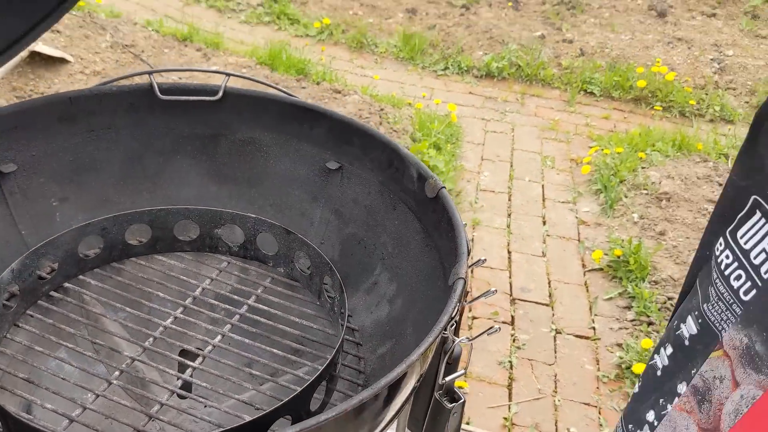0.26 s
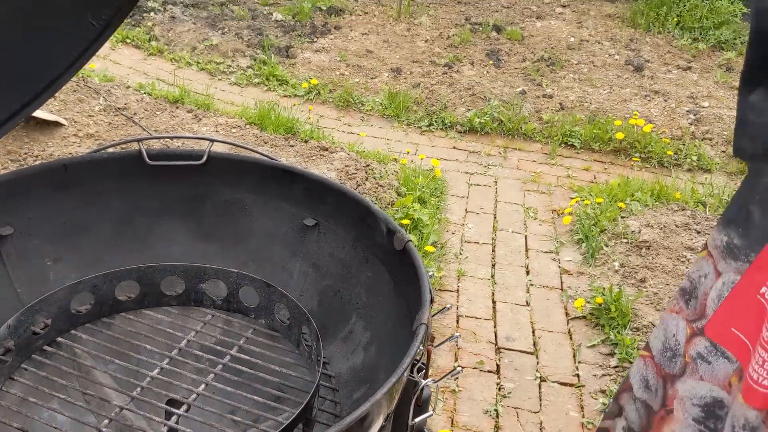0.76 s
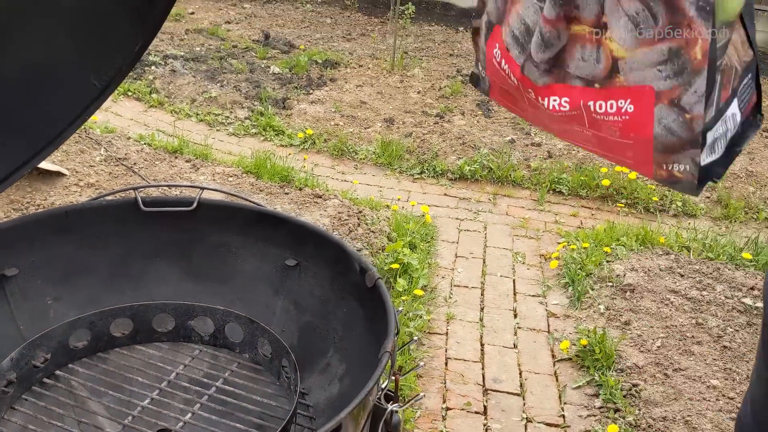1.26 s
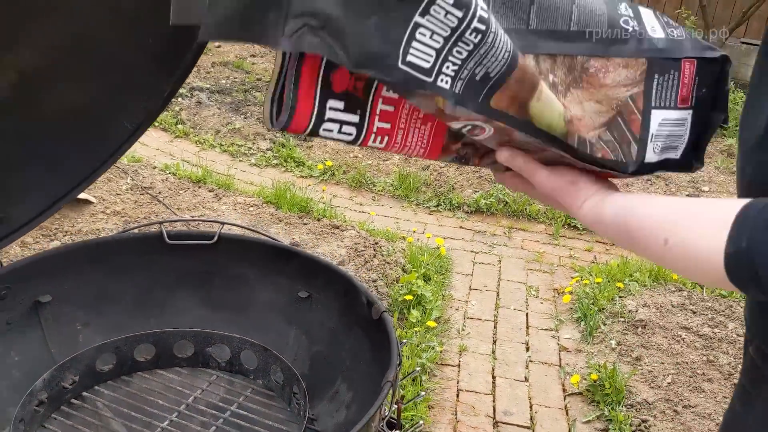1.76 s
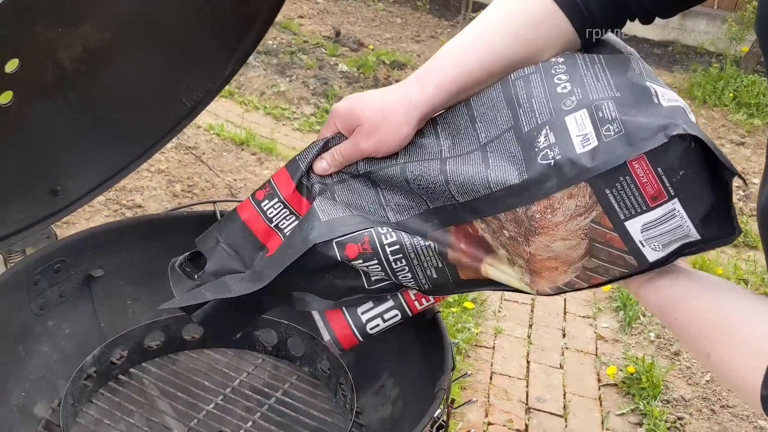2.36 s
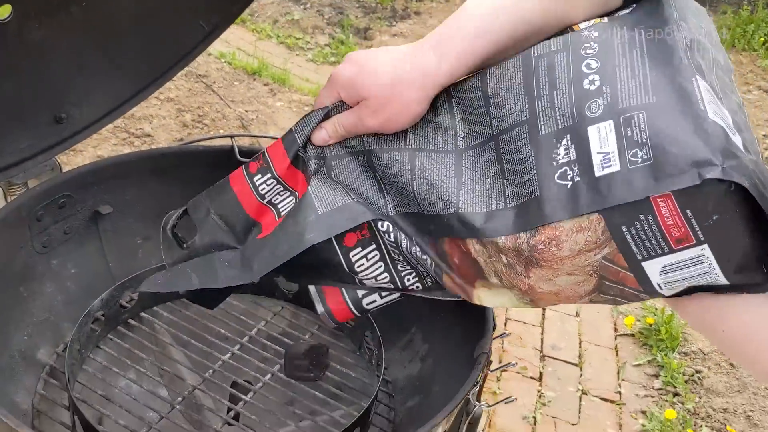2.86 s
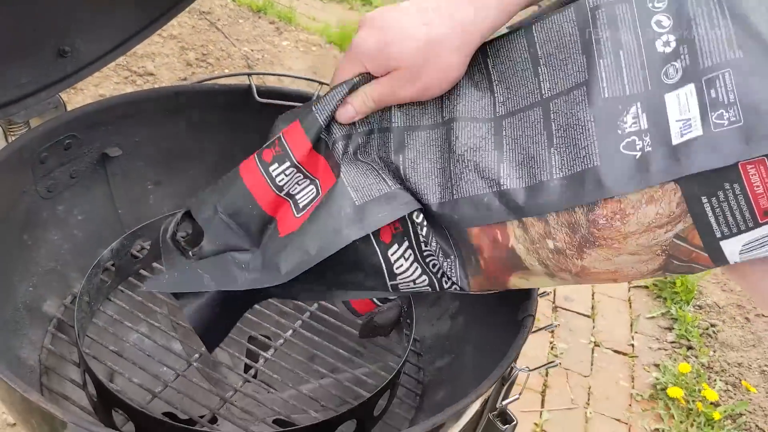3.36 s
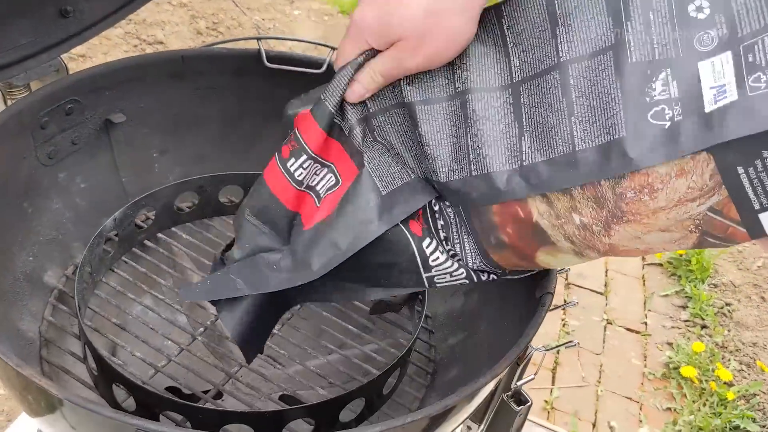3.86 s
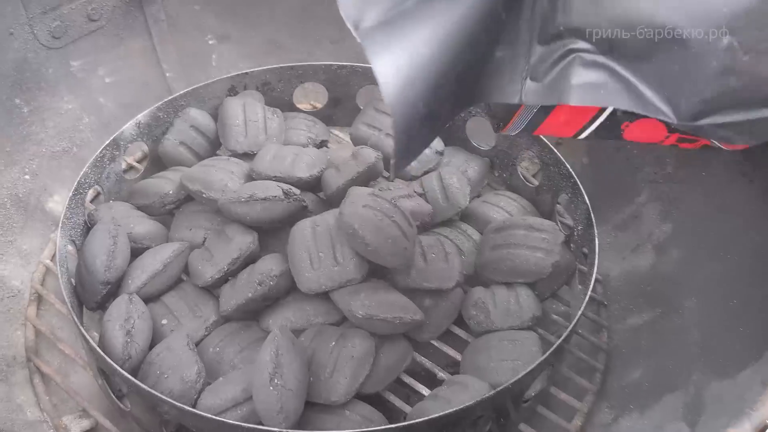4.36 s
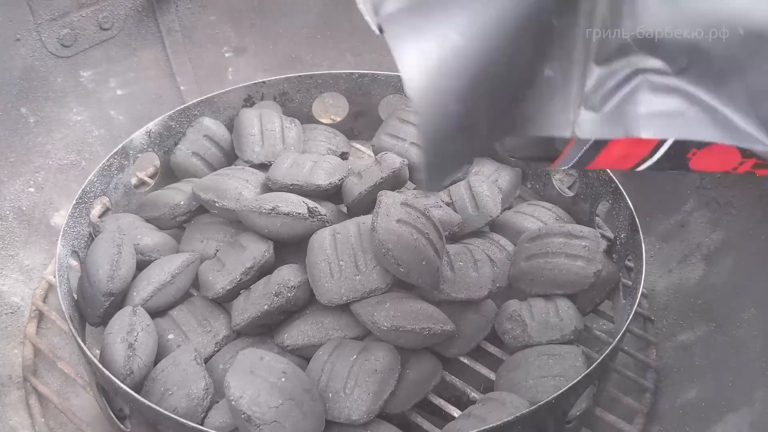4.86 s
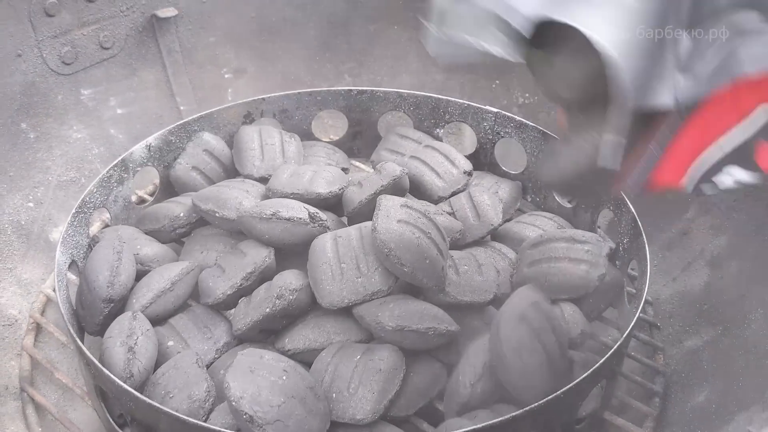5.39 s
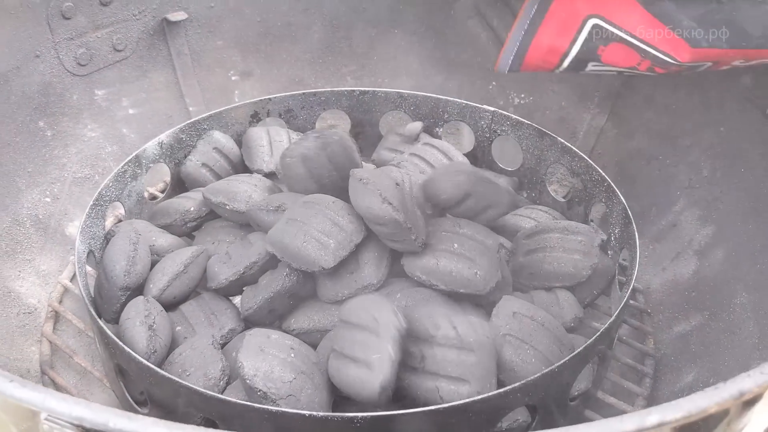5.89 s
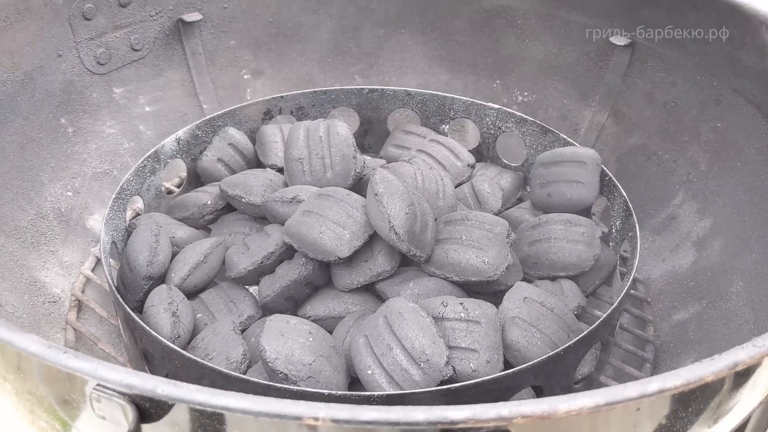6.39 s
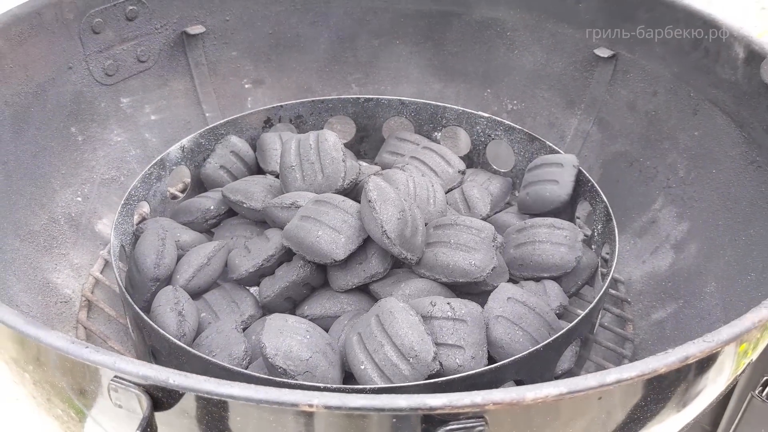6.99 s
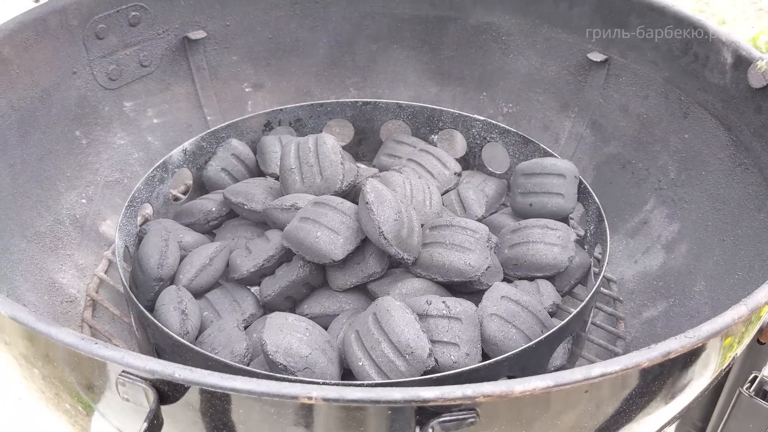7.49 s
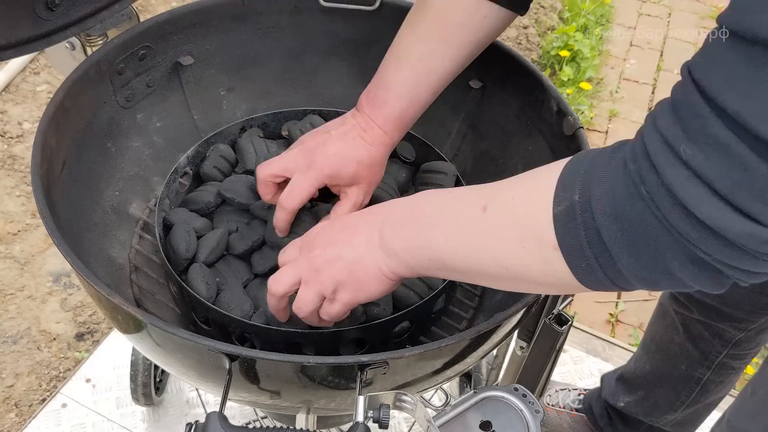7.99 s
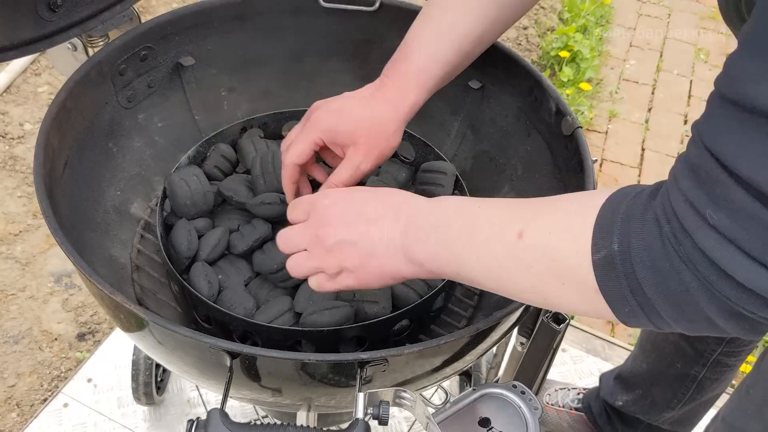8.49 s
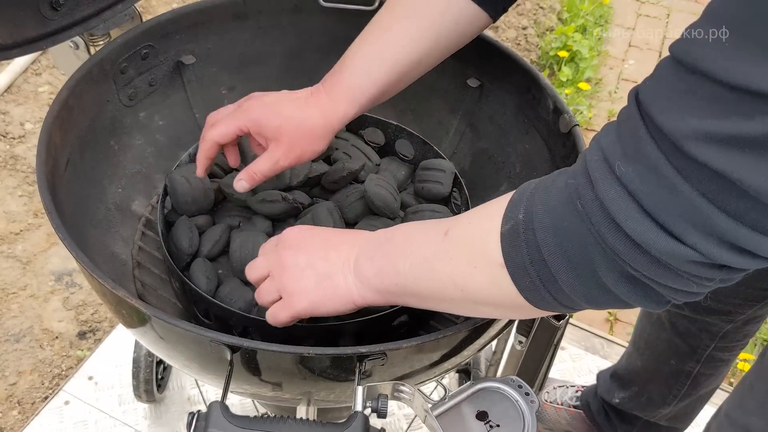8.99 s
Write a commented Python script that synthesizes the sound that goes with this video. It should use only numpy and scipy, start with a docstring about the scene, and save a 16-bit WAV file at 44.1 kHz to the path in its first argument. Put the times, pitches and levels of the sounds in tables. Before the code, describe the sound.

A stiff bag of charcoal briquettes is lifted with a scuff and scattered dull knocks, then shaken and poured into a steel kettle grill. Dense dry clatter, low bag thuds and clinks from the grate continue, thinning to single knocks. The sound cuts out briefly, returns with two tiny pops, then sparse quiet clinks as hands arrange the coals. Close microphone, outdoors, little background.

```python
"""First a brief dull scuff and near quiet, then lumps begin to knock: a stiff bag of charcoal briquettes is
lifted, shaken and poured into a steel kettle grill outdoors. Short crowded modes make the knocks, a hail of
tiny ones over noise the rattle, shaped noise the bag's thuds and the bowl's hum, ringing modes the clinking
grate. The sound drops out for a moment and returns with two pops, falling tones with ticks, treble left and
bass right."""
import sys
import numpy as np
from scipy import signal
from scipy.fft import rfft, irfft
from scipy.io import wavfile
from scipy.ndimage import uniform_filter1d

SR = 44100
rng = np.random.default_rng(int(sys.argv[2]) if len(sys.argv) > 2 else 0)


def write(x):
    x = np.atleast_2d(x).T
    wavfile.write(sys.argv[1], SR, np.round(np.clip(x, -1, 1) * 32767).astype(np.int16))


N = 407880  # length in samples

# How hard the coals tumble, one curve before the drop-out and one after:
# start_s, level_db (of the rattle's body), treble_db (against the body)
TUMBLE = [
    [(0.0, -45.5, -30), (0.04, -85, 9), (0.16, -72.5, -8), (0.24, -60, -2.5), (0.43, -52, -15),
     (0.7, -72.5, -8.5), (0.77, -41, -20), (0.96, -63.5, 2), (1.23, -49.5, -10.5), (1.33, -61.5, -17),
     (1.58, -74, -14), (1.62, -57.5, -1), (1.85, -52.5, -22), (2.05, -53, -16.5), (2.28, -39.5, -10.5),
     (2.6, -40.5, -12), (2.71, -46.5, -15), (2.85, -42, -5), (2.93, -46, -15), (2.96, -40, -3),
     (3.48, -41, -13.5), (3.86, -38.5, -11.5), (3.9, -41.5, 0.5), (4.24, -38.5, -6), (4.255, -47, -22.5),
     (4.42, -39.5, -11), (4.71, -48, -14), (5.08, -37.5, -16.5), (5.27, -47.5, -8), (5.65, -34, -14.5),
     (6.02, -55, -0.5), (6.12, -57, 1.5), (6.21, -64, -2.5), (6.5, -52.5, -3), (6.72, -47, -4),
     (7.15, -40, -9), (7.66, -60, -5)],
    [(7.98, -108, 11), (8.07, -102, 10), (8.13, -88.5, 16), (8.33, -71.5, 4), (8.46, -76, 2),
     (8.7, -102, 0), (8.84, -68, -3), (8.968, -76.5, -2.5), (9.249, -80.5, 1)],
]
# Clear single knocks: start_s, level_db, body_db, grit_db, t60_s (of the tail's fade)
KNOCKS = [(0.185, -48.5, 1.5, -6, 0.23), (0.2807, -52, -2, 3, 0.064), (0.299, -43, 6, -29, 0.17),
          (0.317, -37.5, 6.5, -27, 0.14), (0.342, -53, 20, 2, 0.047), (0.3834, -42.5, -1, 2.5, 0.47),
          (0.407, -41.5, 8, 0, 0.11), (0.4286, -46, 5, -6, 0.15), (0.448, -30.5, -2, -26, 0.13),
          (0.5621, -56, 10, 1, 0.59), (0.6271, -52, 6.5, -19, 0.082), (0.74, -43.5, 10.5, -6, 0.14),
          (0.7485, -34, -0.5, -9, 0.59), (0.7717, -29, -11, -5, 0.26), (0.797, -29, -0.5, -9, 0.22),
          (0.813, -36, 1, -1, 0.052), (0.8657, -33.5, 2.5, -5, 0.14), (0.875, -44, -10, -10, 0.073),
          (0.91, -36.5, 0.5, -23, 0.054), (0.973, -43, -5, -9, 0.062), (1.0355, -39, 5.5, 1, 0.03),
          (1.045, -25, -17, -10, 0.056), (1.0943, -29, 0.5, -0.5, 0.024), (1.1177, -35, 2, -14, 0.076),
          (1.137, -35, -5, -12, .06), (1.151, -34, -1, -22, 0.21), (1.178, -32, 1.5, -6, 0.25),
          (1.207, -31.5, 4.5, -10, 0.082), (1.2209, -25.5, -2.5, -16, 0.2), (1.2343, -31, -1, -2.5, 0.15),
          (1.2572, -37, 3, -21, 0.16), (1.3544, -34, 1.5, -46, 0.026), (1.372, -56, 17, -36, 0.042),
          (1.4377, -26, -4, -17, 0.08), (1.601, -62, -14, 11, 0.075), (1.625, -49.5, 11, -21, 0.042),
          (1.738, -55.5, 15.5, -24, 0.21), (1.8179, -43, 7.5, -19, 0.2), (1.8332, -38.5, 4, -21, 0.084),
          (1.87, -30, -12, -19, 0.042), (1.8932, -37.5, 6, -20, 0.044), (2.0311, -27.5, 1, -11.5, 0.057),
          (2.0779, -32.5, 2.5, -13, 0.082), (2.104, -44, 11, -11, 0.082), (2.124, -31, 3.5, -1.5, 0.089),
          (2.1494, -28.5, -3, -5, 0.13), (2.2078, -30.5, 1.5, -21, 0.8), (2.232, -34, 4, -19, 0.052),
          (2.26, -32.5, -1, 1, 0.029), (2.288, -28, -6, -36, 0.084), (2.2997, -19.5, -6, -15.5, 0.06),
          (2.3525, -29, 1, -3, 0.78), (2.4112, -29, 3.5, -42, 0.15), (2.4425, -25.5, -3, -34, 0.15),
          (2.4976, -37, 10, -25, 0.061), (2.5475, -33.5, 13.5, -7, 0.037), (2.58, -30, -11, -3, 0.17),
          (2.6048, -30, 0, -3.5, 0.45), (2.7668, -31, -4, -11, 0.11), (2.7983, -41.5, 13, -4, 0.21),
          (2.806, -42, -1, -13.5, 0.059), (2.828, -25, -3, -29.5, 0.3), (2.8557, -26.5, -1, -0.5, 0.16),
          (2.866, -36, 3, 10, 0.081), (2.877, -37, 7, -3.5, 0.046), (2.8847, -28.5, 3.5, -27.5, 0.098),
          (2.9253, -34, 2, -9, .06), (3.01, -27, -24, -8, 0.082), (3.054, -34, -6, -6, .06),
          (3.09, -33, -8, -7, 0.083), (3.1225, -35, 11, -23, 0.17), (3.147, -31, -10, -26, 0.081),
          (3.25, -39, 14, -23.5, 0.068), (3.276, -45, 6, -12.5, 0.056), (3.298, -28, -2, -14, 0.075),
          (3.337, -37.5, 13.5, -31, 0.072), (3.357, -26.5, -8, -5.5, 0.05), (3.365, -29, -16, -4, 0.047),
          (3.446, -29, -9, -6, 0.32), (3.463, -24, -2.5, -12, 1), (3.5082, -26, 1.5, -8, 0.32),
          (3.5441, -25.5, 2.5, -5, 0.047), (3.5675, -27, -17, -33, 0.069), (3.595, -25, -25, -7, 0.035),
          (3.645, -38, -6, -12, .07), (3.6914, -31.5, 1, 1.5, 0.54), (3.721, -23, -14, -25, 0.097),
          (3.761, -32, -1, 0, 0.15), (3.7824, -31, -1, 3, 0.51), (3.851, -43, 10.5, -23, 0.16),
          (3.896, -31, -2, -14, 0.081), (4.0003, -28.5, 1, -18, 0.38), (4.0223, -29.5, 4, -26, 0.096),
          (4.178, -22, -9, -26.5, 0.11), (4.3059, -25, -4, -18, 0.05), (4.3355, -48, 7, -29, .1),
          (4.3889, -28, 6.5, -33, 0.042), (4.4141, -30, 2, -8, 0.066), (4.471, -36.5, 10, -23, 0.055),
          (4.5238, -37, 4.5, -29, 0.34), (4.5704, -32, -4, -8, 0.082), (4.5903, -39.5, 7.5, -7, 0.48),
          (4.7175, -25, -5, -15, 0.045), (4.807, -41.5, 7, -23, 0.17), (4.836, -40, -12, 1, 0.075),
          (4.879, -29, 0, -14, 0.21), (4.886, -29.5, -12, -7.5, 0.067), (4.9205, -30, 4, -8.5, 0.65),
          (4.981, -32.5, 0.5, -10, 0.59), (5.043, -27, -10, -17, 0.095), (5.0743, -35, -9, -23, .1),
          (5.1187, -31, -7, -16, 0.043), (5.173, -35.5, -22, -8, 0.13), (5.2231, -36, 5.5, -3, 0.42),
          (5.2708, -38.5, 5, -18, 0.053), (5.323, -24.5, -15, -27, 0.032), (5.367, -29, -4, -36, 0.051),
          (5.387, -41.5, 6.5, -11, 0.069), (5.4038, -27, -6, -5, 0.87), (5.477, -29.5, -2, -3, 0.28),
          (5.5037, -23, -6.5, -31, 0.81), (5.5987, -37, -1, -30, 0.082), (5.625, -33, -5, -28, 0.077),
          (5.7104, -32.5, -12, -9, 0.083), (5.732, -34, -3, 1, 0.093), (5.8368, -46, 16, -20, 0.11),
          (5.929, -31.5, -4, -1.5, 0.15), (6.0228, -25, -5, -21, 0.15), (5.958, -38, 6.5, -11, 0.16),
          (6.058, -34.5, 2, -5, 0.081), (6.106, -28, 0.5, -39, 0.03), (6.2447, -52.5, 17, 4, 0.055),
          (6.329, -30, -4.5, -17, 0.077), (6.373, -37, -7, -16.5, 0.089), (6.4606, -31, -38, 0, 0.12),
          (6.524, -26.5, -1, -21, 0.27), (6.5496, -28, -4, -4, 0.17), (6.5744, -30, 3, -12, 0.057),
          (6.654, -37.5, 8, -17.5, 0.08), (6.667, -25, -6, -9, 0.27), (6.6921, -29.5, 3, -7, 0.2),
          (6.818, -31, 1, -8, 0.54), (6.8533, -41, 10, -16.5, 0.062), (6.8917, -34, 5, -10, 0.095),
          (6.9633, -41.5, 13, -24, 0.077), (6.9898, -38.5, 5.5, -22, 0.2), (7.038, -40.5, 4, -9, 0.076),
          (7.0892, -45, -0.5, -14, 0.065), (7.1106, -28.5, 0.5, -27.5, 0.42), (7.24, -32, 5, -17.5, 0.11),
          (7.2615, -35, 1, 0.5, 0.16), (7.3118, -30, 0, -9, 0.31), (7.396, -36.5, -1, -29, 0.068),
          (7.4854, -49, 7, -9, 0.16), (7.5554, -38, -1, -16, 0.18), (7.6003, -36.5, -0.5, -12, 0.061),
          (7.6804, -35.5, -3.5, -4, 0.78), (8.119, -77.5, 26, 17, 0.23), (8.234, -64.5, 8, 18, 0.17),
          (8.2834, -49.5, 2.5, 2, 0.48), (8.3178, -57, 8, -20, 0.13), (8.345, -62, 14, -20, 0.087),
          (8.3718, -61, 16.5, -35, 0.1), (8.41, -48, 1, 4, 0.33), (8.7765, -62.5, 11, 2, 0.098),
          (8.823, -63, 12, -14, 0.12), (8.842, -48, 5, -33, 0.13), (9.018, -73, 21.5, -15, 0.16),
          (9.054, -34.5, -13, -4.5, 0.089), (9.0646, -39.5, 2, -13, 0.18), (9.089, -52, 9, -16, 0.23),
          (9.224, -53.5, 2.5, 7, 0.25)]
# Blows on the steel: start_s, level_db, centre_hz (of the struck modes), reach_octaves,
# t60_s (of the extra damping by the coals lying on it)
CLINKS = [(2.9562, -32.5, 3160, 0.7, 0.62), (2.985, -32, 4230, 0.57, 0.76), (3.05, -38.5, 3120, 0.34, 0.39),
          (3.896, -30.5, 3370, 0.67, 1.4), (3.9523, -36, 3060, 0.62, 0.75), (4.063, -42, 9690, 0.5, 0.55),
          (4.119, -30, 2440, 3.9, 1.1), (4.3055, -31.5, 2400, 0.16, 0.097), (4.425, -31, 3230, 0.16, 0.33),
          (5.74, -34.5, 3130, 0.28, 0.92), (5.852, -39, 3050, 0.066, 1.1), (5.931, -33, 5240, 0.11, 1.7),
          (5.935, -34.5, 3050, 0.46, 2.2), (6.022, -31.5, 2700, 0.52, 0.6), (6.06, -46, 3020, 0.33, 1.8),
          (6.025, -38, 10500, 0.17, 1.2), (6.16, -50, 8950, 1.1, .3), (6.2454, -43.5, 3120, 0.36, 0.67),
          (6.407, -43, 8400, 0.69, 0.93), (6.4598, -31.5, 3320, 0.25, 0.47),
          (8.128, -67.5, 2740, 0.4, 0.37), (8.2313, -68, 8000, 0.8, .2), (8.291, -47, 3120, 0.2, 0.26),
          (8.38, -55, 2960, 0.11, 0.29), (8.4134, -42.5, 3000, 4.2, 4.8), (8.7824, -59, 2960, 0.45, 0.22),
          (8.853, -53, 2880, 0.6, 0.36), (9.019, -67, 2800, 0.21, 0.37), (9.018, -65, 7000, .1, 0.11),
          (9.06, -51.5, 4460, 1.4, 1.7), (9.1, -55, 12000, 1.1, 1), (9.229, -48.5, 3020, 0.34, .2)]
# Modes of the grate and ring: pitch_hz, level_db, t60_s
STEEL_MODES = [(1534, -6, .36), (1803, -8, .33), (2062, -6, .36), (2309, -9, .5), (2562, -5, .42),
               (2670, -3, .22), (2460, -10, .3), (2815, -9, .5), (2896, -19, 1.2), (2950, -1, .3),
               (3068, -7, .33), (3365, -17, 1.5), (3420, -17, 1.3), (3499, -14, 1.5), (3610, -16, 1.3),
               (3709, -8, .45), (3865, -9, .35), (4113, -10, .26), (4296, -14, .35), (4750, -14, .22),
               (5087, -10, .25), (5383, -9, .22), (6013, -13, .27), (6605, -14, .19), (6980, -13, .2),
               (7434, -15, .28), (7784, -16, .26), (8340, -14, .18), (9130, -10, .17), (9710, -8, .17),
               (10380, -10, .12), (11500, -15, .14), (14500, -10, .15)]
# Low modes of the kettle bowl: pitch_hz, width_hz, level_db
BOWL_MODES = [(187, 12, -4), (208, 13, 0), (260, 22, -13), (282, 16, -14), (325, 18, -12), (420, 90, -30)]
# Spectrum of the rattling coal: pitch_hz, level_db (relative, per Hz)
COAL_COLOUR = [(100, -28.5), (155, 4), (210, 3.5), (460, 0.5), (561, 4.5), (851, -1.5), (1290, -3),
               (1920, -8.5), (3030, -3), (4770, -14.5), (7990, -20.5), (9750, -17), (10800, -23),
               (14200, -24), (16000, -31)]
# Spectrum of the bag's thuds: pitch_hz, level_db (relative, per Hz)
THUD_COLOUR = [(18, -42.5), (30, -30.5), (51, 4), (75, 5.5), (150, -0.5), (221, -7.5), (260, -6.5),
               (340, -48.5), (570, -120)]
# What every knock excites in the bag and heap: pitch_hz, level_db
HEAP_COLOUR = [(140, -9.5), (210, -4), (400, -6), (590, -1), (850, -4), (1200, -1.5), (1600, -6),
               (2000, -5.5), (2900, -2), (3600, -3.5), (16000, -8.5)]
# Load dropping inside the bag: start_s (of the peak), level_db
JOLTS = [(0.0, -65), (0.47, -45.5), (0.83, -42.5), (1.26, -50), (1.76, -45.5), (2.25, -43.5), (2.4, -43.5),
         (2.58, -49), (2.92, -42.5), (3.04, -71), (3.33, -54), (3.47, -38), (3.84, -40), (3.97, -42.5),
         (4.18, -41.5), (4.3, -37), (4.63, -37), (4.87, -39.5), (4.95, -36), (5.25, -34), (5.47, -38),
         (5.6, -41), (5.72, -35.5), (6.56, -44), (6.67, -38), (6.8, -43.5), (7.03, -53.5), (7.14, -39.5),
         (7.33, -44.5), (7.57, -53.5)]
# Touches that set the bowl humming: start_s (of the peak), level_db
TOUCHES = [(5.526, -47), (5.716, -42), (5.878, -43.5), (6.0, -44), (6.09, -53), (6.17, -57), (6.25, -52),
           (6.56, -44.5), (8.05, -68), (8.11, -49.5), (8.296, -44.5), (8.39, -44), (8.52, -62), (8.79, -50),
           (8.86, -50), (9.03, -53), (9.08, -53.5), (9.24, -49)]
# Two pops after the drop-out: start_s, level_db
POPS = [(7.918, -45.5), (7.9268, -39)]
# Low swing after the pops, opposite in the two sides: centre_s, pitch_hz, level_db
THUMP = (7.9445, 58, -36.5)
# Likeness of the left and right noise: pitch_hz, likeness (1 = identical)
LIKENESS = [(60, 0.85), (130, 0.86), (290, 0.82), (640, 0.9), (1200, 0.8), (1900, 0.13), (3100, 0.9),
            (4500, 0.084), (15000, 0.05)]
# Phase by which the left leads the right: pitch_hz, lead_rad
LEFT_LEAD = [(60, 0), (600, 0.16), (1200, -0.54), (2000, -0.72), (3000, -1.96), (15000, -1)]
# Stereo balance before the drop-out: pitch_hz, left_minus_right_db
POUR_BALANCE = [(60, -0.8), (180, 0), (550, -0.3), (1200, 0.5), (2300, -1.8), (4970, 1.2), (15000, 2.5)]
# Stereo balance after it: pitch_hz, left_minus_right_db
LATE_BALANCE = [(60, -2), (100, -9), (180, -20), (310, -21), (550, -15), (950, 5), (1650, 31), (2860, 56),
                (4970, 51), (8640, 54), (15000, 33)]
# Drop-out: start_s, end_s; the layers fall silent at the start, the balance switches midway
DROPOUT_S = (7.74, 7.9)

EDGE_HZ = 16000  # top of the band, and of the lumps' modes
HUSH_DB, CEILING_DB = -101, -20  # noise floor; level at which peaks are rounded
CRISP_DB, CRISP_SHARE = -0.5, 0.49  # the rattle's middle band follows the treble part of the way
JOLT_RISE_S, JOLT_T60_S, DRAG_DB = 0.18, 0.46, -8  # DRAG: steady thudding under the rattle
TOUCH_RISE_S, BOWL_T60_S = 0.1, 0.64
CRACK_S, TAIL_DB = 0.003, -6  # time constant of a knock's opening crack; tail against the crack
IN_STEP = 0.28  # part of the modes' swing that starts in step and gives a knock its hard edge
LINGER_DB, LINGER_T60_S = -17, 0.57  # fade of a faint wash that the kettle keeps under each knock


def gain_of(db):
    """Decibels to linear gain."""
    return 10 ** (np.asarray(db) / 20)


def evened(x):
    """Brings a sound to rms 1."""
    return x / np.sqrt(np.mean(x ** 2) + 1e-20)


def read(points, hz):
    """Reads a curve along a logarithmic pitch axis."""
    f, value = np.transpose(points)
    return np.interp(np.log(hz + 1), np.log(f + 1), value)


def columns(tables):
    """Columns of a time curve, sample by sample."""
    rows = np.vstack(tables)
    return [np.interp(np.arange(N) / SR, rows[:, 0], c) for c in rows[:, 1:].T]


def add(mix, s, sound):
    """Lays a sound into the mix at a time in seconds."""
    part = mix[:, round(s * SR):][:, :sound.shape[1]]
    part += sound[:, :part.shape[1]]


def during(t0, t1):
    """One between the two times, with soft edges."""
    t = np.arange(N) / SR
    return uniform_filter1d(1. * (t > t0) * (t < t1), size=64)


def swells(events, rise_s, t60):
    """Envelope of events that swell to their peak and die away, summed as power."""
    spikes = np.zeros((1, N))
    t = np.arange(-SR // 2, SR // 2 + 1) / SR
    for s, db in events:
        add(spikes, s, gain_of([[2 * db]]))
    shape = gain_of(-120 * np.where(t < 0, -t / rise_s, t / t60))  # 60 dB of power over each of the two times
    return np.sqrt(abs(signal.oaconvolve(spikes[0], shape, "same")))


def pair(hz):
    """Left and right noise spectra, alike or unrelated according to pitch."""
    a, b, c, d = rng.standard_normal((4,) + np.shape(hz))
    same = np.clip(read(LIKENESS, hz), -1, 1)
    late = np.exp(-1j * read(LEFT_LEAD, hz))
    left = a + 1j * b
    right = same * late * left + np.sqrt(1 - same ** 2) * (c + 1j * d)
    return np.array([left, right])


def split(x, edges_hz):
    """Cuts a sound into neighbouring bands, each of rms 1."""
    hz, z = np.fft.rfftfreq(N, 1 / SR), rfft(x)
    below = [0] + [1 / (1 + (hz / edge) ** 8) for edge in edges_hz] + [1]
    return [evened(irfft(z * np.sqrt(np.clip(hi - lo, 0, 1)), N)) for lo, hi in zip(below, below[1:])]


def sided(x, balance):
    """Shares each frequency between the two sides."""
    left = gain_of(read(balance, np.fft.rfftfreq(N, 1 / SR)))
    return irfft(rfft(x) * 2 / (1 + left) * np.array([left, left ** 0]), N)


def modes(hz, t60, size):
    """One exponentially dying wave for each mode."""
    return np.exp(np.outer(2j * np.pi * hz - np.log(1000) / t60, np.arange(size) / SR)).astype(np.complex64)


def strike(hz, waves, db, shift_hz=0, in_step=0, even=0):
    """Each mode reaches the two microphones with its own strength and phase."""
    start = pair(hz)
    start = start / abs(start) ** even  # even=1 leaves only the phase to chance
    start = start - 1j * in_step * np.exp(-1j * np.outer([0, 1], read(LEFT_LEAD, hz)))
    rung = (start * gain_of(db)).astype(np.complex64) @ waves
    return (rung * np.exp(2j * np.pi * shift_hz * np.arange(waves.shape[1]) / SR)).real


def lumps(colours, lumpy_db, count=420):
    """One sound for each (body, grit, t60): a crowd of short modes, the high ones dying first."""
    hz, t = np.geomspace(200, EDGE_HZ, count), np.arange(4000) / SR
    hz = hz * (1 + 0.0054 * rng.standard_normal(count))
    window = np.hanning(8000)[4000:].astype(np.float32) ** .5
    waves = modes(hz, 0.5 * (hz / 1000) ** -.3, size=4000) * window
    waves = waves * (1 - np.exp(-np.outer(hz, t) / 3.06)).astype(np.float32)  # low modes start more slowly
    for body_db, grit_db, t60 in colours:
        # each lump has its own form, and its own modes
        shape_db = lumpy_db * evened(uniform_filter1d(rng.standard_normal(count), size=10)) / (1 + hz / 6000)
        shift_hz = rng.uniform(-80, 80)
        tilt_db = read([(220, body_db - 3), (1100, body_db), (2800, 0.0026),
                        (9000, grit_db), (15000, grit_db - 4.5)], hz)
        crack = np.exp(-t / CRACK_S)
        tail = gain_of(TAIL_DB - 60 * t / max(t60, .01))
        linger = gain_of(LINGER_DB - 60 * t / LINGER_T60_S)
        gain_db = tilt_db + read(HEAP_COLOUR, hz + shift_hz)
        rung = strike(hz, waves, gain_db + shape_db, shift_hz, IN_STEP)
        loudness = np.sqrt(np.mean(gain_of(2 * gain_db))) * 1.3
        yield rung / np.std(rung[:, :500]) * loudness * (crack + tail + linger)


def hum(low_hz=150):
    """The low modes of the bowl, resonances in noise kept alive by every touch."""
    hz = np.fft.rfftfreq(N, 1 / SR)
    resonances = sum(gain_of(db) * (width / (width + 1.3j * (hz - f))) ** 2 for f, width, db in BOWL_MODES)
    low_cut = 1 + (low_hz / (hz + 1)) ** 7
    bowl = evened(irfft(pair(hz) * resonances / low_cut, N))
    return swells(TOUCHES, TOUCH_RISE_S, BOWL_T60_S) * bowl


def thuds(lumpy_db=3.5):
    """Dull, uneven jolts of the heavy bag: low noise that swells as the load drops."""
    hz = np.fft.rfftfreq(N, 1 / SR)
    wander = uniform_filter1d(uniform_filter1d(rng.standard_normal(N), size=700), size=700)
    jolts_db = lumpy_db * evened(wander)
    jolts = evened(gain_of(jolts_db) * irfft(pair(hz) * gain_of(read(THUD_COLOUR, hz)), N))
    drag = gain_of(columns(TUMBLE)[0] + DRAG_DB)
    return np.hypot(swells(JOLTS, JOLT_RISE_S, JOLT_T60_S), drag) * jolts * during(0, DROPOUT_S[0])


def clinks(spread=0.02, crowd_db=-5.5, count=8):
    """A blow rings the steel near its centre; bars of like length crowd round each mode and die sooner."""
    hz, db, t60 = np.repeat(np.transpose(STEEL_MODES), count, axis=1)
    crowd = np.arange(len(hz)) % count > 0  # the first of each group is the mode itself
    hz = hz * (1 + spread * crowd * rng.standard_normal(len(hz)))
    db = db + crowd_db * crowd
    t60 = t60 * np.where(crowd, rng.uniform(0.2, 0.9, len(hz)), 1)
    window = np.hanning(44000)[22000:].astype(np.float32) ** .5
    out, waves = np.zeros((2, N)), modes(hz, t60, size=22000) * window
    for s, level_db, centre_hz, octaves, damped_s in CLINKS:
        distance = np.log2(hz / centre_hz) / max(octaves, .05)
        gain_db = db - np.minimum(6 * distance ** 2, 28)
        fade = gain_of(level_db - 60 * np.arange(22000) / SR / max(damped_s, .03))
        rung = 1.48 * strike(hz, waves, gain_db, even=1.0) / np.linalg.norm(gain_of(gain_db))
        add(out, s, fade * rung)
    return out


def pops(turns=1.9, t60=0.081):
    """Each pop is a tick and a quickly falling tone; a low thump follows."""
    t, out = np.arange(1, 3000) / SR, np.zeros((2, N))
    fall = np.cos(2 * np.pi * turns * np.log(1 + t / 0.00176))  # logarithmic phase: the pitch drops
    fall = fall * gain_of(-60 * t / t60) * (1 - np.exp(-t / 0.0054))
    tick = np.sin(2 * np.pi * 2000 * t) * np.exp(-(t / 0.00012 - 2.5) ** 2)
    for s, db in POPS:
        add(out, s, gain_of(db) * np.array([-.9 * tick - 1.15 * fall] * 2))
    s, hz, db = THUMP
    t = np.arange(N) / SR - s
    thump = gain_of(db) * np.cos(2 * np.pi * hz * t) * np.exp(-(t / 0.0051) ** 2)
    return out + np.outer([1, -1], thump)


def rattle(per_s=260, spread_db=3.5, dust_db=-11, fine_dust_db=-2, count=16):
    """A dense hail of small collisions over sliding dust, in the colour of the coal."""
    size = gain_of(spread_db * np.minimum(rng.exponential(1, N), 3.5)) * (rng.random(N) < per_s / SR)
    which = rng.integers(0, count, N)
    kinds = lumps([(0, 0, 0.035)] * count, lumpy_db=4.0)
    hail = sum(signal.oaconvolve((size * (which == k))[None], evened(lump), axes=1)[:, :N]
               for k, lump in enumerate(kinds))
    hz, z = np.fft.rfftfreq(N, 1 / SR), rfft(hail)
    # flatten the hail's broad spectrum, so that the coal's colour alone sets it
    log_level = uniform_filter1d(np.log(abs(z[:, ::20])).mean(0), size=100)
    flat = z / np.exp(np.interp(hz, hz[::20], log_level))
    dust = gain_of(read([(1000, dust_db), (9000, fine_dust_db)], hz)) * pair(hz)
    coloured = irfft((flat + dust) * gain_of(read(COAL_COLOUR, hz)), N)
    body, crisp, grit = split(coloured, (1700, 5500))
    db, grit_db = columns(TUMBLE)
    crisp_db = CRISP_DB + CRISP_SHARE * grit_db
    return gain_of(db) * (body + gain_of(crisp_db) * crisp + gain_of(grit_db) * grit)


def knocks():
    """Briquettes striking each other and the bag wall, one burst of short modes for each blow."""
    out = np.zeros((2, N))
    for (s, db, *_), sound in zip(KNOCKS, lumps(np.array(KNOCKS)[:, 2:], lumpy_db=4.0)):
        add(out, s, gain_of(db) * sound)
    return out


def scene():
    """All layers, muted from the drop-out until the second tumble curve starts; the pops are not muted."""
    silent = during(DROPOUT_S[0], TUMBLE[1][0][0])
    layers = hum() + thuds() + clinks() + rattle() + knocks()
    return layers * (1 - silent) + pops()


def record(dry):
    """The sides part after the drop-out; peaks are rounded, low self-noise added, the band limited."""
    late = np.arange(N) > np.mean(DROPOUT_S) * SR
    both = np.where(late, sided(dry * late, LATE_BALANCE), sided(dry * ~late, POUR_BALANCE))
    both = gain_of(CEILING_DB) * np.tanh(both / gain_of(CEILING_DB))
    hush = gain_of(HUSH_DB) * evened(signal.lfilter([1], [1, -.9], rng.standard_normal(dry.shape)))
    band_limit = signal.firwin(511, EDGE_HZ, window=("kaiser", 9), fs=SR)
    return signal.oaconvolve(both + hush, band_limit[None], "same")


dry = scene()
out = record(dry)
write(out)
```